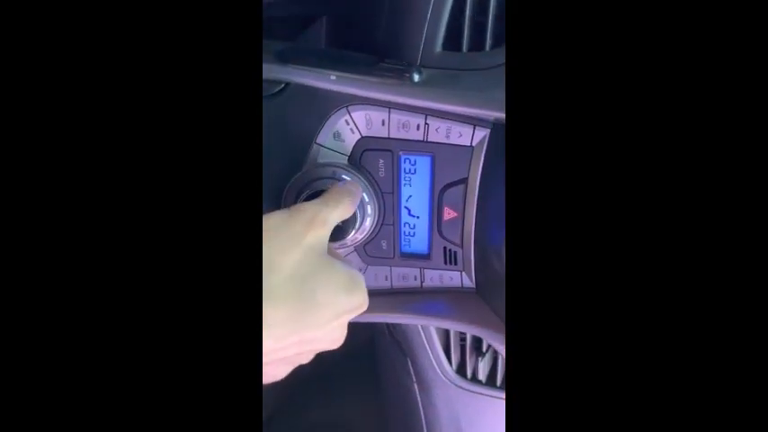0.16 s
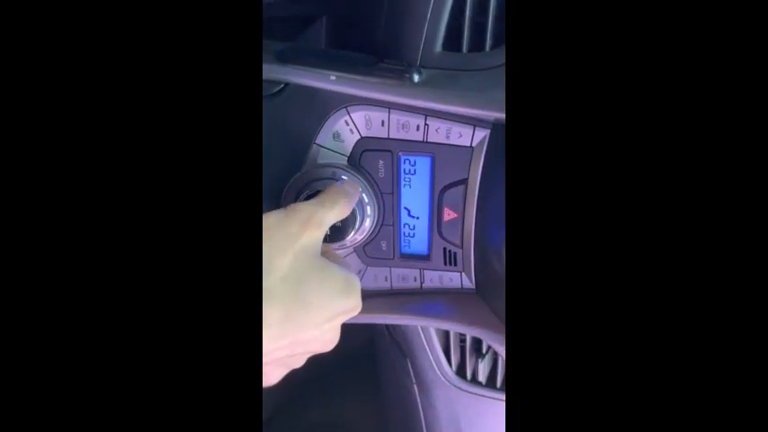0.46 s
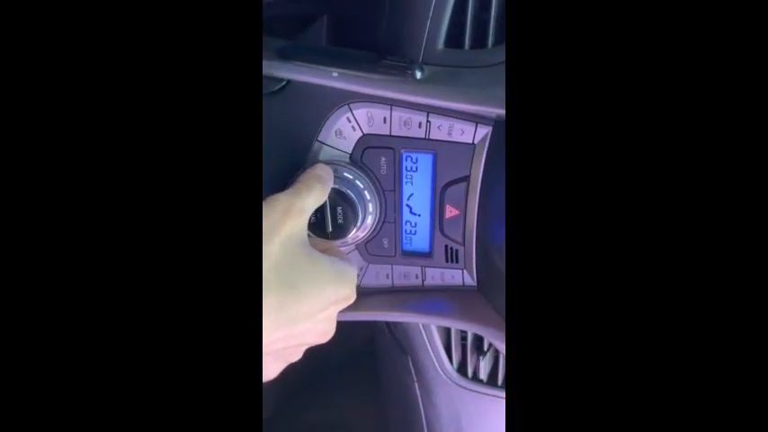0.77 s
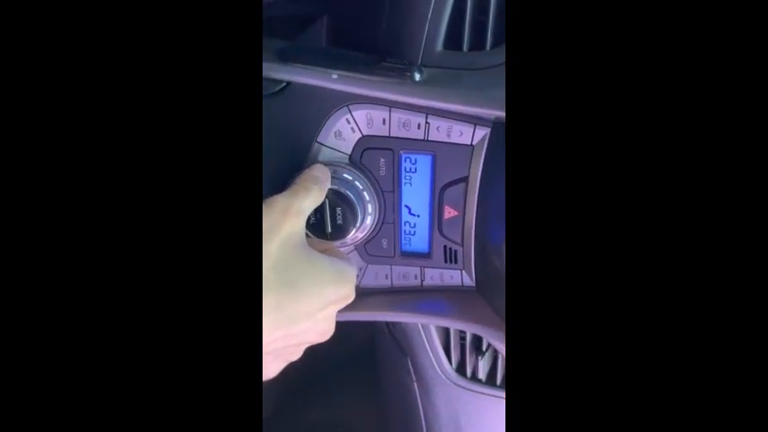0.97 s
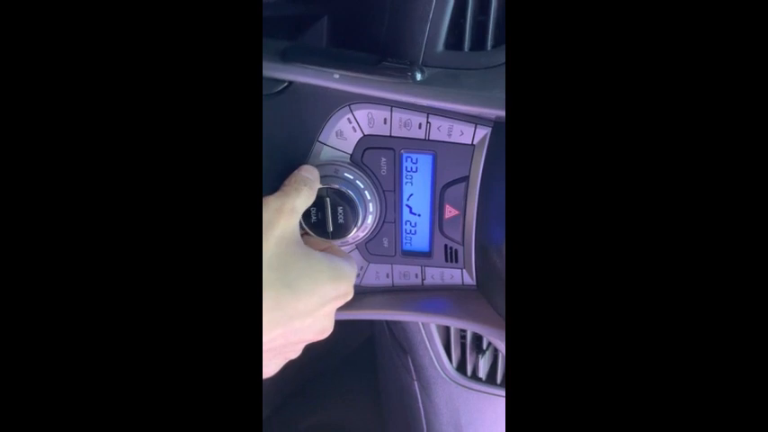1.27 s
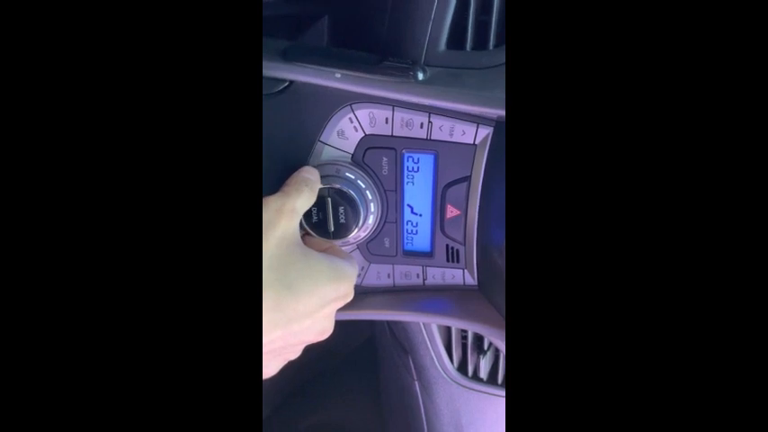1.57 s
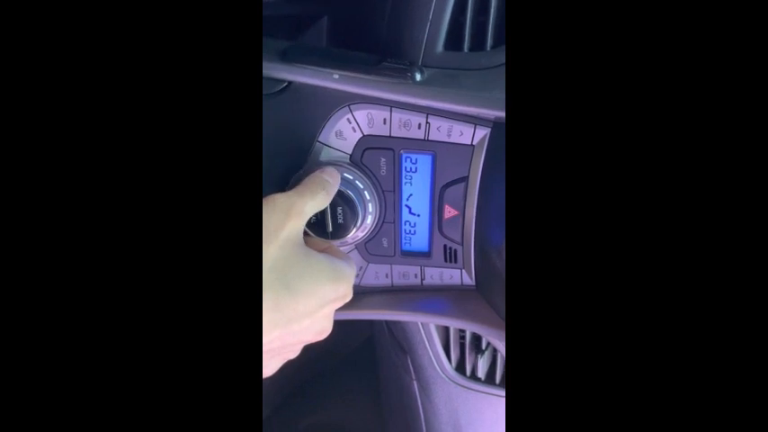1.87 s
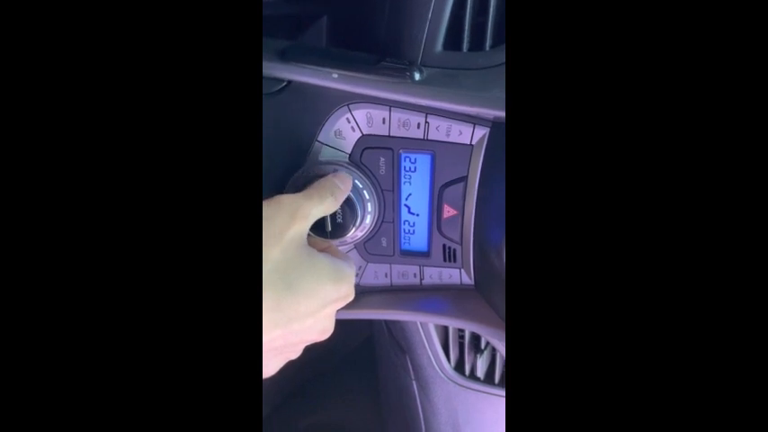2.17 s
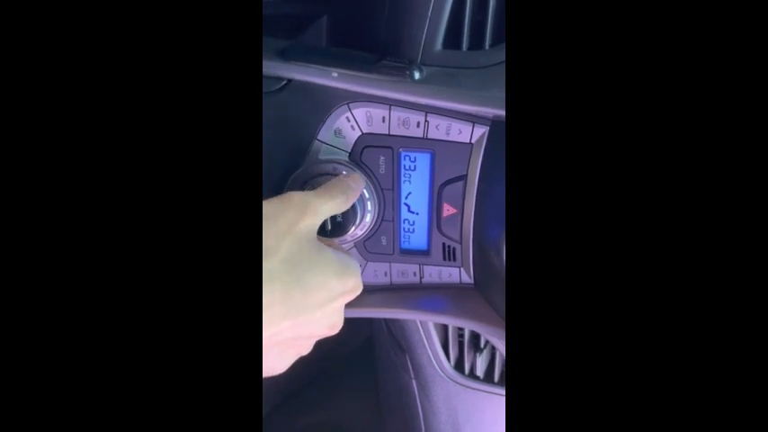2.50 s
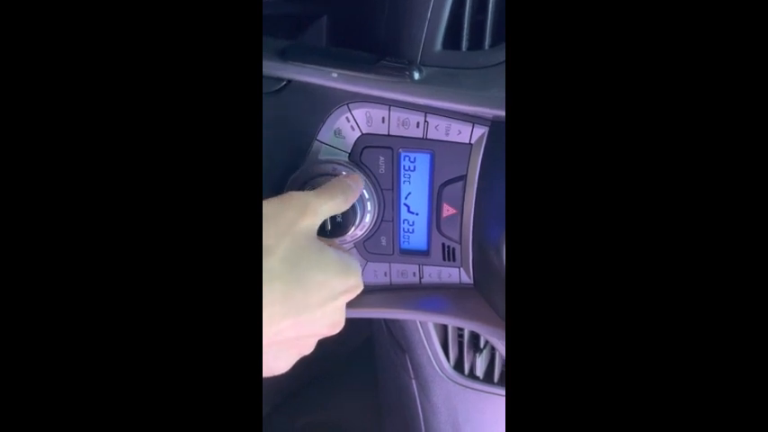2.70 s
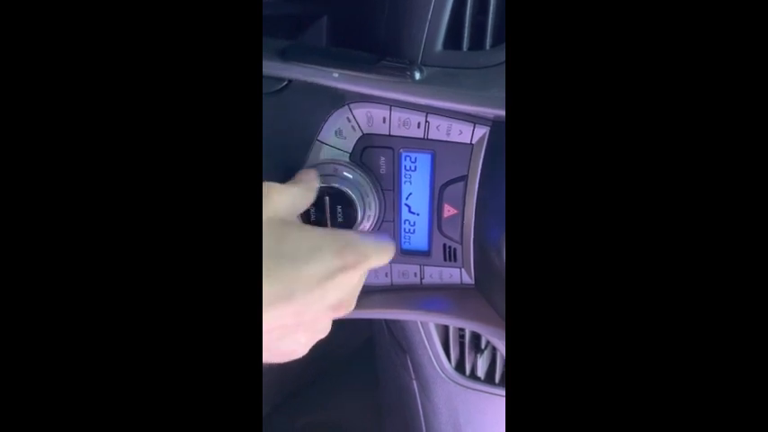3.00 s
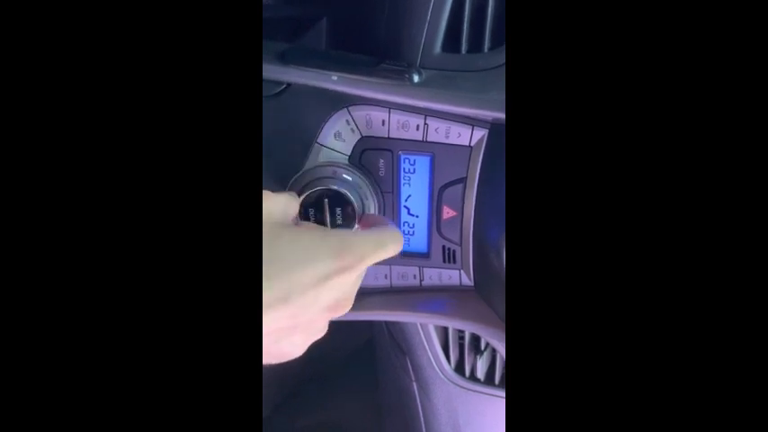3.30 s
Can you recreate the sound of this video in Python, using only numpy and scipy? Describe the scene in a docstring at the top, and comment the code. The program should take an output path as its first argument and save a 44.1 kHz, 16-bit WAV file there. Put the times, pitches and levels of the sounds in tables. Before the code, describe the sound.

Ratcheting clicks of a car's climate knob, a long pause, then a faster spin over airy hum

```python
"""Inside a parked car, a hand turns the ratcheting climate dial, rests, then spins it again, faster.
Behind it air rushes from the vents: shaped noise with duct resonances, a low roar and fuzzy fan tones.
The cabin booms low and lumpy, with dull decaying thumps and brief gusts on the microphone.
The dial is snaps of coloured noise, ringing plastic and spring modes, scrapes and dull panel knocks, with
a short padded-cabin tail; the microphone rolls off the bass and the whole is band-limited near 16 kHz."""
import sys
import numpy as np
from scipy import signal
from scipy.fft import rfft, irfft
from scipy.io import wavfile
from scipy.ndimage import uniform_filter1d

SR = 44100
rng = np.random.default_rng(int(sys.argv[2]) if len(sys.argv) > 2 else 0)


def master_out(mix):
    """Clip the mix to full scale and print it as 16-bit PCM to the path in sys.argv[1]."""
    frames = np.transpose(np.atleast_2d(mix))
    ceiling = np.clip(frames, -1, 1)
    pcm = np.round(ceiling * 32767).astype(np.int16)
    wavfile.write(sys.argv[1], SR, pcm)


N = 152145  # length in samples

# Vent rush over time, before the wide-band gain: time_s, level_db (700-2000 Hz), treble_db (2500-7000 Hz)
VENT_RUSH = [(0.0, -55.5, -68), (0.19, -60.5, -78), (0.32, -54, -66.5), (0.64, -51, -63.5),
             (1.29, -52.5, -63.5), (1.6, -52.5, -64), (2.22, -53, -66), (2.73, -54, -66.5),
             (2.95, -53.5, -66), (3.06, -52, -66.5), (3.23, -62, -72.5), (3.45, -64, -78)]
# Spectrum of the vent rush: frequency_hz, density_db (relative, per Hz)
VENT_RUSH_SPECTRUM = [(240, -33.5), (400, 3.5), (439, 0), (789, -9), (852, -8), (1310, -13), (1530, -13.5),
                      (1650, -15.5), (2400, -25), (3930, -29), (8370, -45.5), (9470, -72.5), (13300, -76),
                      (15000, -54), (16000, -63)]
# Resonances of the air ducts: centre_hz, width_hz, lift_db
DUCT_RESONANCES = [(330, 52, -4.5), (505, 110, -3), (790, 71, 2), (1383, 62, 1), (3360, 140, 4)]
# Fan tones, level at the median rush: pitch_hz, width_hz, level_db
FAN_TONES = [(257, 8, -59), (290, 10, -55), (366, 11, -61), (455, 14, -62), (508, 14, -63), (838, 25, -65),
             (1550, 45, -68), (2248, 40, -78), (3540, 70, -82), (3957, 45, -81.5)]
# Low roar of the vents over time: time_s, level_db
ROAR = [(0.0, -46), (0.36, -49.5), (0.64, -51.5), (1.25, -46), (2.88, -43), (3.45, -45)]
# Spectrum of the low roar: frequency_hz, density_db (relative, per Hz)
ROAR_SPECTRUM = [(71, -21.5), (120, 1), (232, -14), (290, -8.5), (335, -12), (425, -13), (900, -31.5),
                 (1400, -92.5)]
# Cabin boom over time: time_s, level_db
CABIN_BOOM = [(0.0, -37), (0.18, -36.5), (0.51, -29.5), (0.71, -25), (1.21, -31.5), (2.33, -32),
              (2.97, -28.5), (3.12, -40), (3.45, -33)]
# Spectrum of the cabin boom: frequency_hz, density_db (relative, per Hz)
CABIN_BOOM_SPECTRUM = [(16, -29), (30, -12), (52, -2.5), (66, 1.5), (110, -5.5), (162, -38.5), (200, -17),
                       (260, -34.5), (440, -120)]
# Dull thumps, level of the decay before its soft rise: start_s, level_db, pitch_hz, ring_t60_s
DULL_THUMPS = [(0.532, -6.5, 63.6, 0.17), (0.612, -8, 64, 0.28), (0.961, -5.5, 73.4, 0.061),
               (1.159, -6.5, 78.6, 0.061), (1.568, -14.5, 64.6, 0.15), (1.719, -7.5, 69, 0.062),
               (2.346, -19, 79.3, 0.37), (2.946, -22.5, 70.5, 0.8)]
# Gusts on the microphone: centre_s, peak_db, centre_hz
MIC_GUSTS = [(.535, -22.5, 130), (0.573, -23.5, 247), (0.625, -24.5, 177), (0.654, -20.5, 186),
             (0.748, -23.5, 149), (0.848, -24, 124), (0.97, -22, 130), (1.207, -30, 200)]
# Dial detents, gains of the snap and of the ringing body: start_s, snap_db, ring_db
DETENTS = [(0.031, -40, -35.5), (0.0386, -33.5, -47), (0.0629, -52, -46.5), (0.1155, -39, -34),
           (0.125, -44, -46), (0.1472, -52, -42), (0.1684, -46, -37), (0.175, -29, -36.5),
           (0.2106, -68, -54), (0.2449, -37, -36), (0.2644, -52, -49), (2.9833, -39, -37),
           (2.9886, -28.5, -39), (3.0034, -46, -57), (3.0099, -45, -30), (3.022, -37, -38),
           (3.0271, -41, -35), (3.0332, -29, -31.5), (3.0454, -42, -59), (3.0538, -36, -32),
           (3.0668, -42, -58), (3.0749, -35, -39), (3.089, -25, -30), (3.101, -25, -31), (3.1055, -43, -30),
           (3.1163, -49, -36.5), (3.1208, -40, -36), (3.1324, -52, -68), (3.1396, -36, -57),
           (3.175, -26.5, -33.5), (3.2678, -26, -32), (3.4133, -41.5, -60)]
# Spectrum of the dry plastic: frequency_hz, density_db (relative, per Hz)
PLASTIC_SPECTRUM = [(500, -22), (1200, -7), (2800, -16), (4200, -6), (5400, -7), (6300, -8), (7000, -14),
                    (9000, -21.5), (12000, -41), (13800, -37), (15000, -26), (17000, -46)]
# Ringing modes of the dial body, relative: pitch_hz, level_db, ring_t60_s
DIAL_MODES = [(480, -5, 0.03), (600, -7, 0.025), (893, -6, 0.02), (1305, 1, .012), (1614, 3, 0.011),
              (1850, 3, 0.009), (2300, 1, 0.008), (3257, -2, 0.006)]
# Modes of the detent spring, rung with the snap, relative: pitch_hz, level_db, ring_t60_s
SPRING_MODES = [(5440, -2, .007), (6850, -5, .006)]
# Plastic rubbing on plastic: start_s, length_s, level_db
DIAL_SCRAPES = [(0.021, 0.0375, -50.5), (0.068, 0.025, -54), (0.093, 0.16, -59), (2.974, 0.114, -45),
                (3.082, 0.06, -42.5)]
# Dull panel knocks: start_s, gain_db, pitch_factor
PANEL_KNOCKS = [(.1775, -42, 1.21), (.2990, -36.5, 1.01), (3.0935, -33.5, 1.23)]
# Modes of the panel, relative: pitch_hz, level_db, ring_t60_s
PANEL_MODES = [(740, 7, 0.03), (1500, 10, 0.006), (2400, 6, 0.006)]

RUSH_WIDE_GAIN = 1.51  # whole rush over its middle band
RUSH_TILT = 0.79  # dB per octave for each dB of brightness
TONE_STEADY = 1.5  # steady part of a fan tone against its random wander
THUMP_RISE_S, GUST_CYCLES, GUST_LEAD_S = 0.011, 0.9, 0.02
SNAP_RISE_S, SNAP_T60_S = 0.0014, 0.008
DIAL_RISE_S, KNOCK_RISE_S = 0.0009, 0.0006
DETUNE, STRIKE_DB = 0.05, 2.5  # mode scatter from blow to blow: fraction of pitch, dB
# During the fast spin the spring modes are quieter and drawn with wider random detuning
SPIN_START_S, SPIN_END_S, SPIN_SPRING_DB, SPIN_DETUNE = 2.97, 3.15, -5, 0.09
SCRAPE_TILT_DB, SCRAPE_FLICKER_DB = 8.5, 3  # tilt toward the bass is per octave
CABIN_T60_S, CABIN_DB, CABIN_HZ = 0.04, -15, 4000
LOW_CUT_HZ, HIGH_EDGE_HZ = 46.5, 16050


def amp(db):
    """Decibels to amplitude."""
    return 10 ** (np.asarray(db) / 20)


def even(x):
    """Scale to unit RMS."""
    return x / np.sqrt(np.mean(x ** 2) + 1e-20)


def curve(table, column=1):
    """Draw one table column as a line over the whole scene."""
    rows = np.array(table)
    return np.interp(np.arange(N) / SR, rows[:, 0], rows[:, column])


def add(mix, start_s, sound):
    """Lay a sound into the mix, cut off at the end of the scene."""
    part = mix[round(start_s * SR):][:len(sound)]
    part += sound[:len(part)]


def air(spectrum, patchy_db, flicker_db, tilt_db=np.zeros(N), lifts=(), ripple_db=0, size=2048):
    """Turbulent air: random short-time spectra with drifting patches and broad flicker, at unit RMS."""
    hop = size // 4
    frames, hz = N // hop + 5, np.fft.rfftfreq(size, 1 / SR)
    real, imag, patches = rng.standard_normal((frames, len(hz), 3)).T
    patches = uniform_filter1d(patches, size=10, axis=0)
    patches = even(uniform_filter1d(patches, size=10, axis=1))

    f, db = np.transpose(spectrum)
    shape = np.interp(np.log(hz + 1), np.log(f + 1), db, left=-90, right=-120)
    for centre, width, lift in lifts:
        shape = shape + lift / (1 + (2 * (hz - centre) / width) ** 2)
    # Cabin reflections leave a lasting uneven ripple over the spectrum
    ripple = even(uniform_filter1d(rng.standard_normal(len(hz)), size=2))
    shape = shape + ripple_db * ripple

    octaves = np.log2(np.maximum(hz, 1200) / 1200)  # the tilt acts above 1200 Hz
    tilt = octaves[:, None] * tilt_db[np.minimum(np.arange(frames) * hop, N - 1)]
    flicker = even(uniform_filter1d(rng.standard_normal(frames), size=3))
    level_db = shape[:, None] + tilt + patchy_db * patches + flicker_db * flicker
    bins = (real + 1j * imag) * amp(level_db)
    return even(signal.istft(bins, nperseg=size, noverlap=size - hop)[1][:N])


def vent_rush():
    """Turbulent rush coloured by duct resonances; its treble tilts with the brightness."""
    bright = curve(VENT_RUSH, column=2) - curve(VENT_RUSH)
    tilt_db = RUSH_TILT * (bright - np.median(bright))
    noise = air(VENT_RUSH_SPECTRUM, patchy_db=0.88, flicker_db=-0.18, tilt_db=tilt_db,
                lifts=DUCT_RESONANCES, ripple_db=3.5)
    return RUSH_WIDE_GAIN * amp(curve(VENT_RUSH)) * noise


def vent_roar():
    """Low roar of the moving air: patchy, flickering noise."""
    return amp(curve(ROAR)) * air(ROAR_SPECTRUM, patchy_db=-1.5, flicker_db=-1.1)


def fan_tones():
    """Tones blurred by slow random changes of strength and phase, following the rush level."""
    out, t = np.zeros(N), np.arange(N) / SR
    level = amp(curve(VENT_RUSH))
    level = level / np.median(level)
    for hz, width, db in FAN_TONES:
        pole = np.exp(-np.pi * width / SR)
        noise = rng.standard_normal(N) + 1j * rng.standard_normal(N)
        slow = signal.lfilter([1], [1, -2 * pole, pole * pole], noise)
        wander = TONE_STEADY + even(slow.real) + 1j * even(slow.imag)
        tone = (wander * np.exp(2j * np.pi * hz * t)).real
        out += amp(db) * level * even(tone)
    return out


def cabin_boom():
    """Lumpy low noise of the cabin."""
    return amp(curve(CABIN_BOOM)) * air(CABIN_BOOM_SPECTRUM, patchy_db=0.56, flicker_db=1.34)


def dull_thumps():
    """Low tones that swell softly and ring out."""
    out, t = np.zeros(N), np.arange(SR // 3) / SR
    rise = 1 - np.exp(-(t / THUMP_RISE_S) ** 2)
    for start, db, hz, t60 in DULL_THUMPS:
        add(out, start, amp(db - 60 * t / t60) * rise * np.sin(2 * np.pi * hz * t))
    return out


def mic_gusts():
    """Short pressure pulses on the microphone: a negative peak between smaller positive swings."""
    out, t = np.zeros(N), np.arange(SR // 3) / SR
    for centre, db, hz in MIC_GUSTS:
        cycles = hz * (t - GUST_LEAD_S)
        bell = np.exp(-(2 * cycles / GUST_CYCLES) ** 2)
        add(out, centre - GUST_LEAD_S, -amp(db) * np.cos(2 * np.pi * cycles) * bell)
    return out


def strike(modes, draw, rise_s, detune=DETUNE):
    """A blow rings each mode, a little detuned and unevenly excited."""
    t = np.arange(2500) / SR
    ring = np.zeros(len(t))
    for (hz, db, t60), (strength, offset) in zip(modes, draw):
        decay = amp(db + STRIKE_DB * strength - 60 * t / t60)
        ring += decay * np.sin(2 * np.pi * hz * (1 + detune * offset) * t)
    return (1 - np.exp(-(t / rise_s) ** 2)) * ring


def plastic(noise, tilt_db):
    """Noise coloured like the dry plastic of the dial, tilted toward the bass about 2500 Hz."""
    hz = np.fft.rfftfreq(len(noise), 1 / SR) + 1
    f, db = np.transpose(PLASTIC_SPECTRUM)
    shape = np.interp(np.log(hz), np.log(f), db, left=-60)
    shape = shape + tilt_db * np.log2(2500 / hz)
    return even(irfft(rfft(noise) * amp(shape), len(noise)))


def panel_knocks():
    """Dull knocks that ring the panel modes, shifted together in pitch."""
    out = np.zeros(N)
    no_scatter = np.zeros((len(PANEL_MODES), 2))
    for start, db, pitch in PANEL_KNOCKS:
        modes = np.array(PANEL_MODES) * [pitch, 1, 1]
        add(out, start, amp(db) * strike(modes, no_scatter, KNOCK_RISE_S))
    return out


def dial_scrapes():
    """Plastic rubs on plastic as the dial turns: flickering noise with soft ends."""
    out = np.zeros(N)
    flicker = even(uniform_filter1d(rng.standard_normal(N), size=150))
    rub = plastic(rng.standard_normal(N), SCRAPE_TILT_DB) * amp(SCRAPE_FLICKER_DB * flicker)
    for start, length, db in DIAL_SCRAPES:
        part = rub[round(start * SR):][:round(length * SR)]
        add(out, start, amp(db) * part * signal.windows.tukey(len(part), 0.2))
    return out


def dial_detents():
    """Each detent snaps dry, rings its spring and briefly rings the plastic body."""
    out, t = np.zeros(N), np.arange(2048) / SR
    envelope = (1 - np.exp(-(t / SNAP_RISE_S) ** 2)) * amp(-60 * t / SNAP_T60_S)
    for start, snap_db, ring_db in DETENTS:
        draw = rng.standard_normal((len(DIAL_MODES), 2))
        spun = SPIN_START_S < start < SPIN_END_S
        spring_draw = draw[::-1] * [0.5, 1]  # half the usual strength scatter
        spring = strike(SPRING_MODES, spring_draw, SNAP_RISE_S, SPIN_DETUNE if spun else DETUNE / 4)
        spring = amp(spun * SPIN_SPRING_DB) * spring[:len(t)]
        snap = envelope * plastic(rng.standard_normal(len(t)), 0)
        add(out, start, amp(snap_db) * (snap + spring))
        add(out, start, amp(ring_db) * strike(DIAL_MODES, draw, DIAL_RISE_S))
    return out


def cabin(x):
    """Short, dull tail of a padded cabin: decaying low-passed noise after a 2 ms gap."""
    t = np.arange(SR // 6) / SR
    noise = signal.lfilter(*signal.butter(1, CABIN_HZ, fs=SR), rng.standard_normal(len(t)))
    tail = noise * amp(-60 * t / CABIN_T60_S) * (t > 0.002)
    return x + amp(CABIN_DB) * signal.oaconvolve(x, tail / np.linalg.norm(tail))[:N]


def scene():
    """Vents and cabin air behind the dial; only the dial excites the cabin tail."""
    vents = vent_rush() + vent_roar() + fan_tones()
    low_end = cabin_boom() + dull_thumps() + mic_gusts()
    dial = panel_knocks() + dial_scrapes() + dial_detents()
    return (vents + low_end + cabin(dial))[None]


def record(dry):
    """Bass roll-off of the microphone, then the band limit."""
    cut = signal.lfilter(*signal.butter(2, LOW_CUT_HZ, "high", fs=SR), dry)
    band_limit = signal.firwin(511, HIGH_EDGE_HZ, window=("kaiser", 9), fs=SR)
    return signal.oaconvolve(cut, band_limit[None], "same")


dry = scene()
out = record(dry)
master_out(out)
```